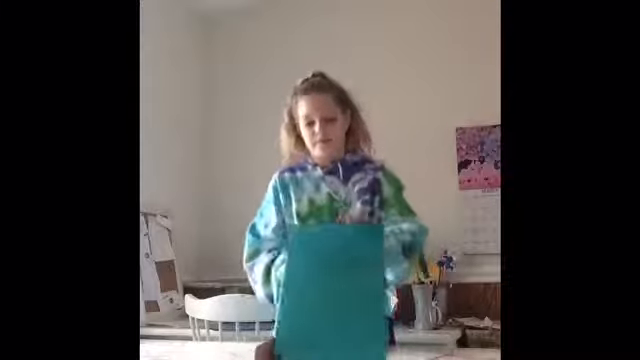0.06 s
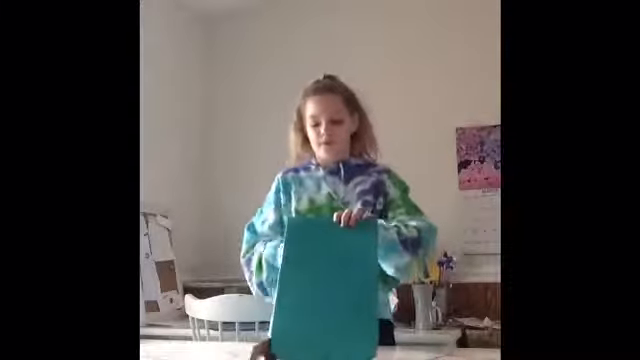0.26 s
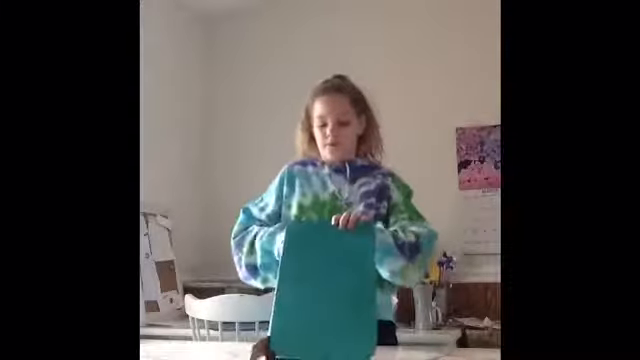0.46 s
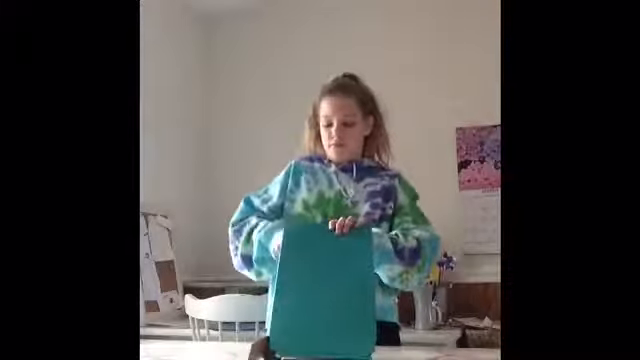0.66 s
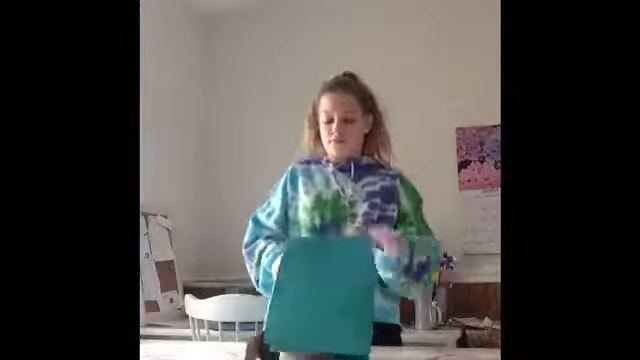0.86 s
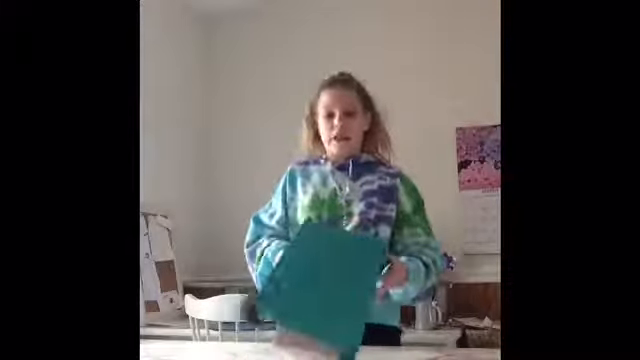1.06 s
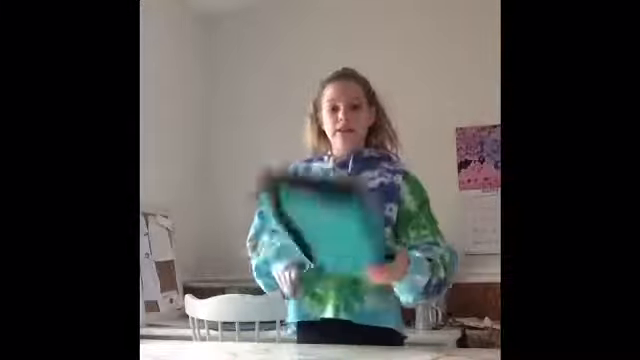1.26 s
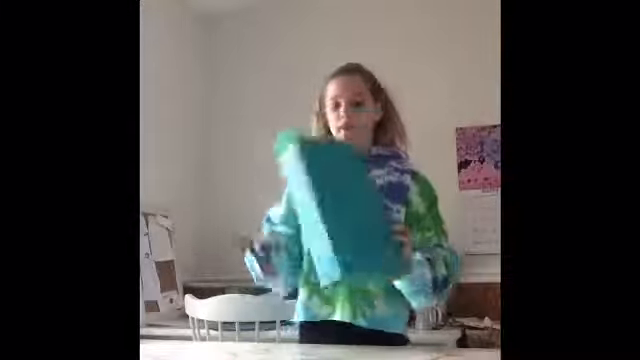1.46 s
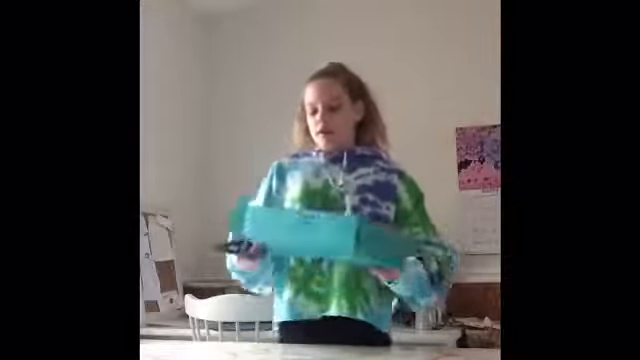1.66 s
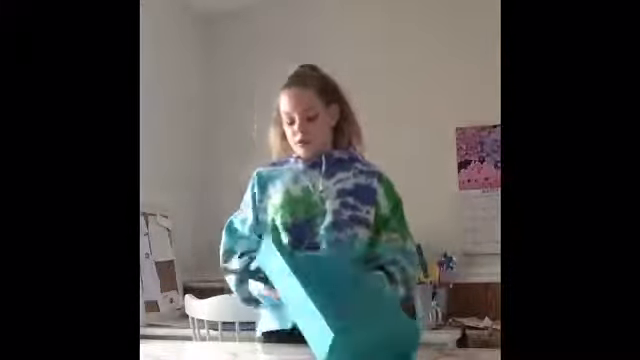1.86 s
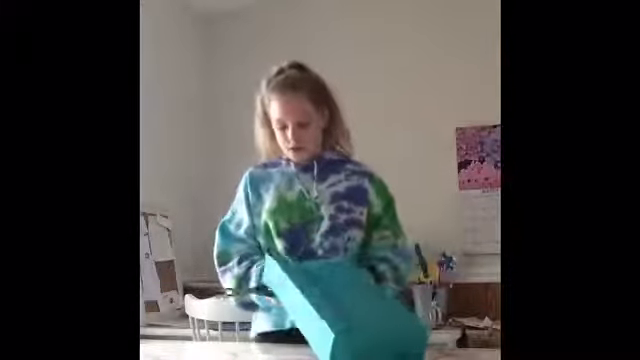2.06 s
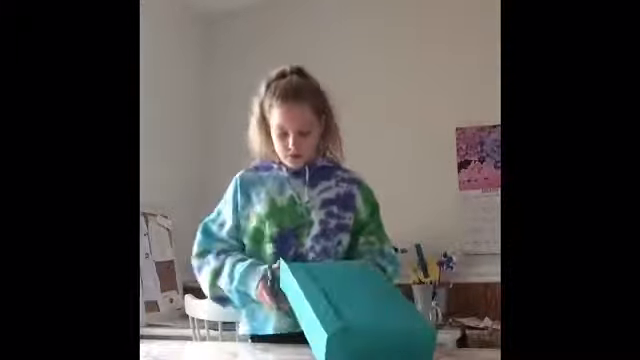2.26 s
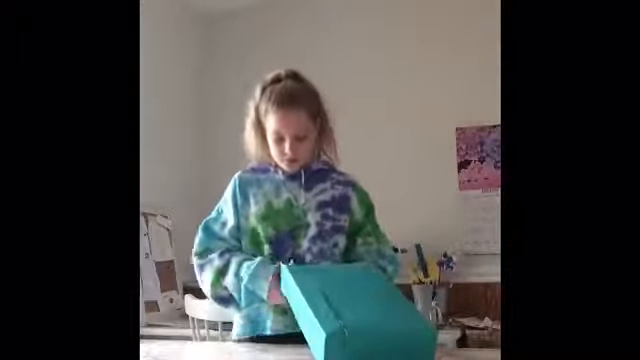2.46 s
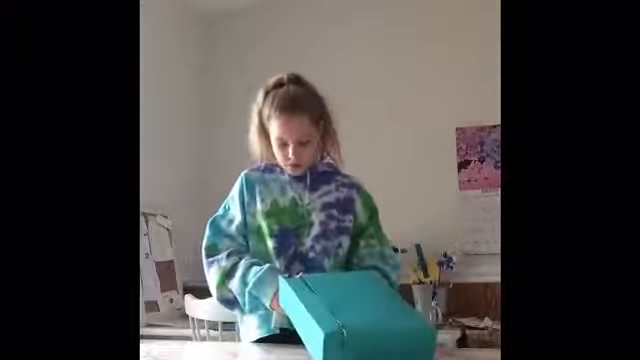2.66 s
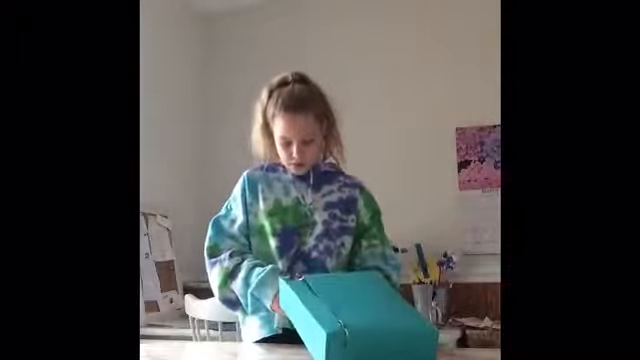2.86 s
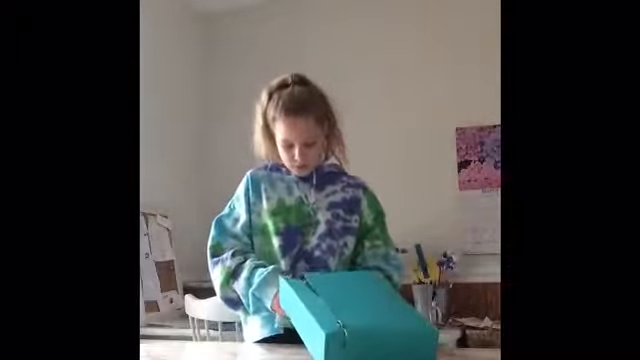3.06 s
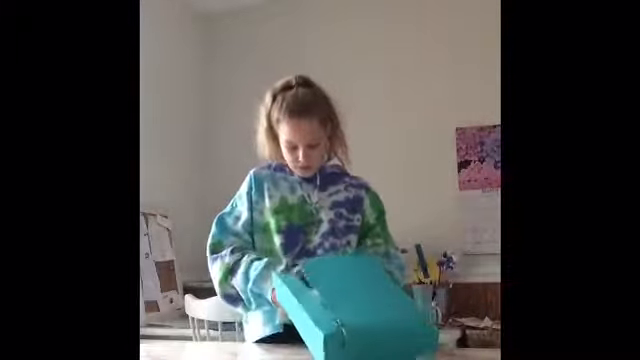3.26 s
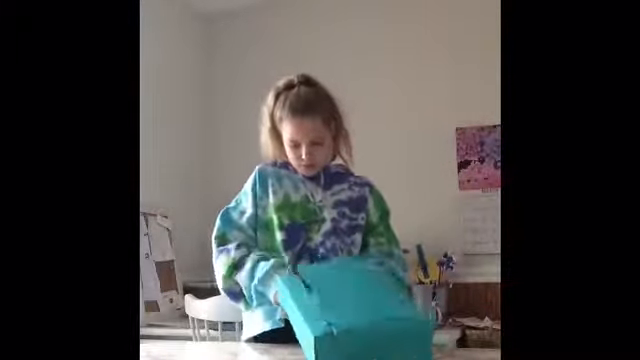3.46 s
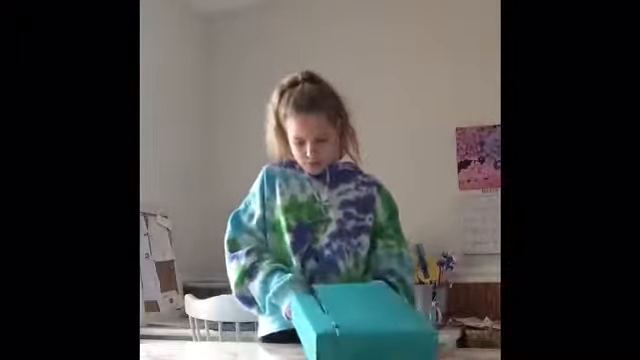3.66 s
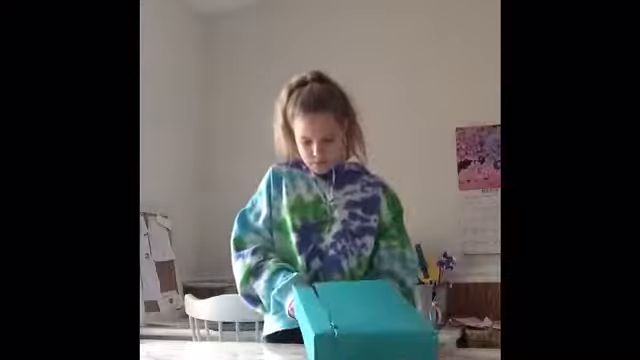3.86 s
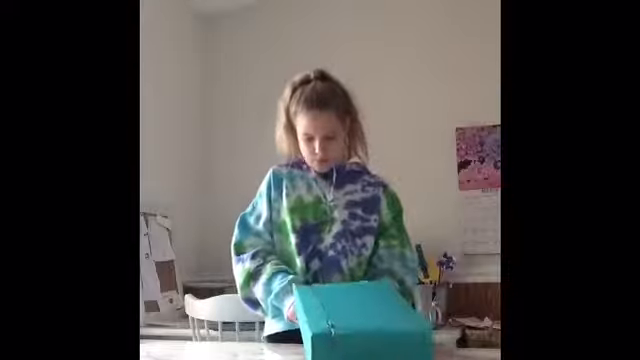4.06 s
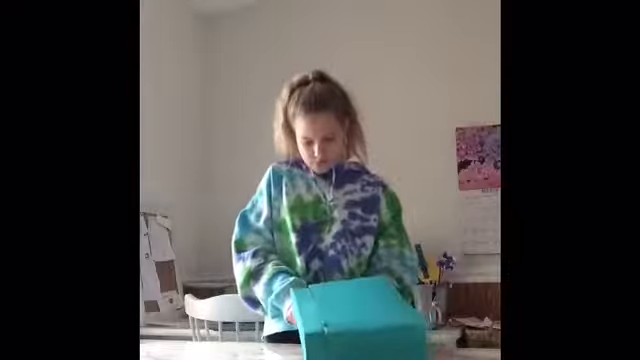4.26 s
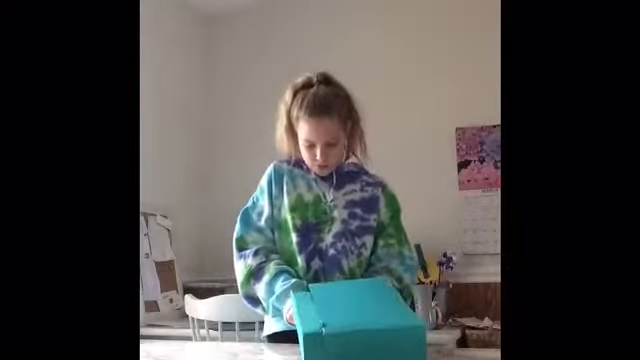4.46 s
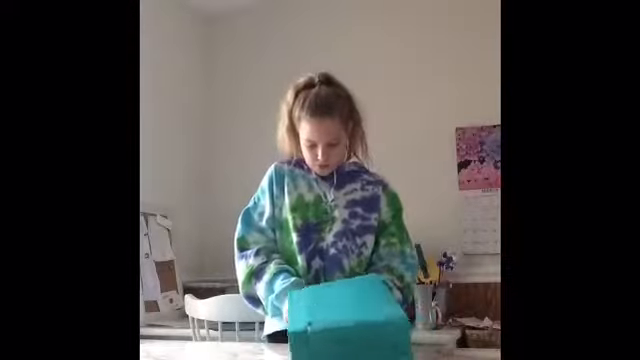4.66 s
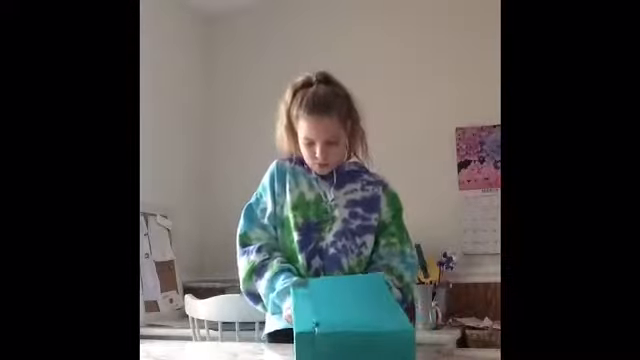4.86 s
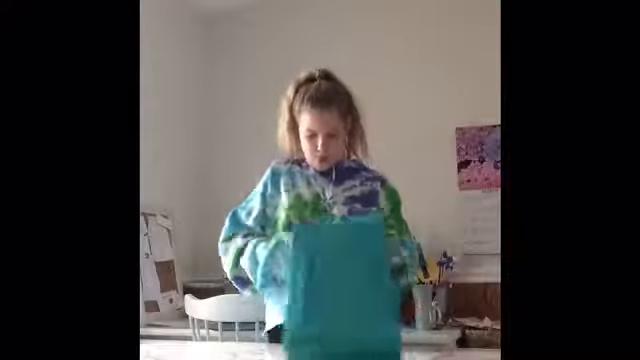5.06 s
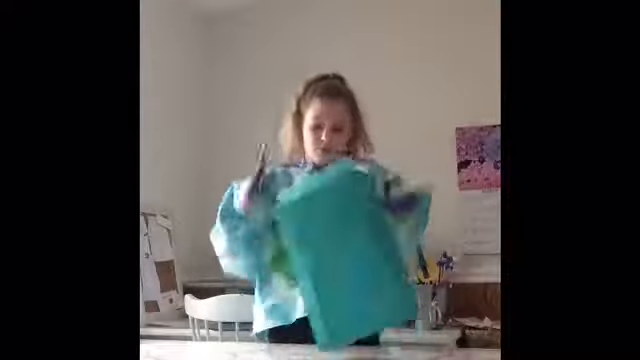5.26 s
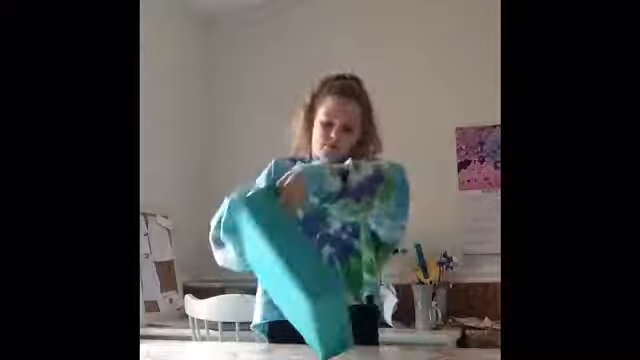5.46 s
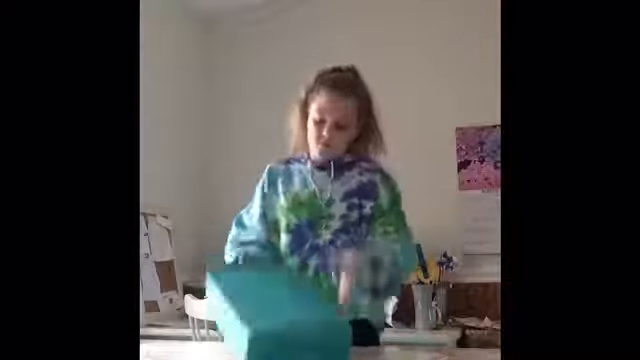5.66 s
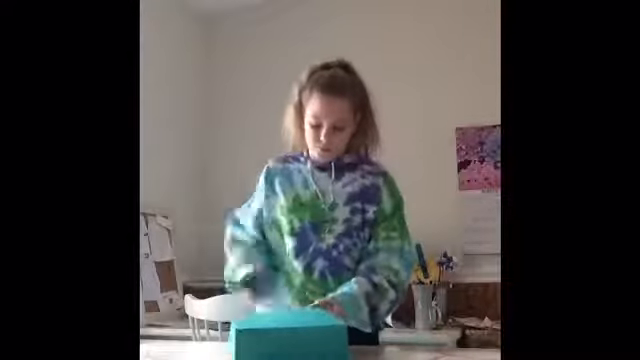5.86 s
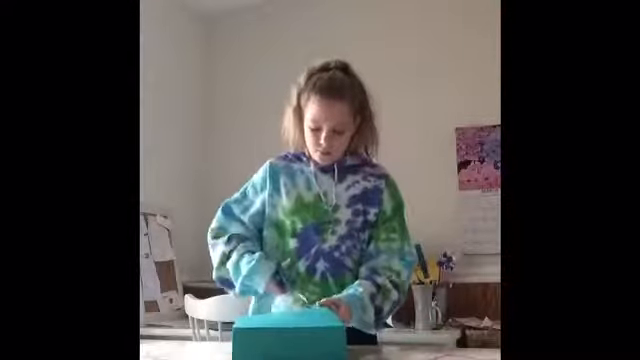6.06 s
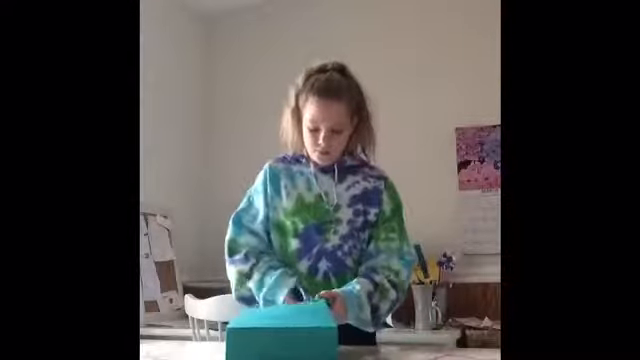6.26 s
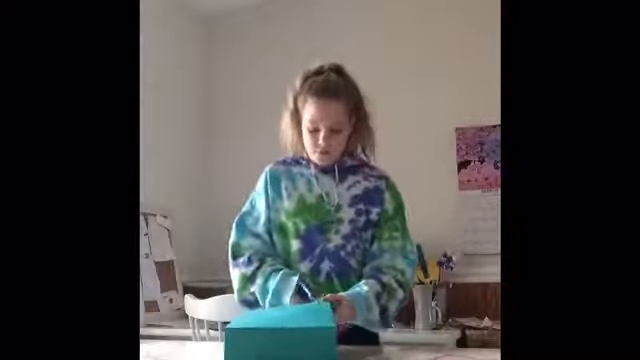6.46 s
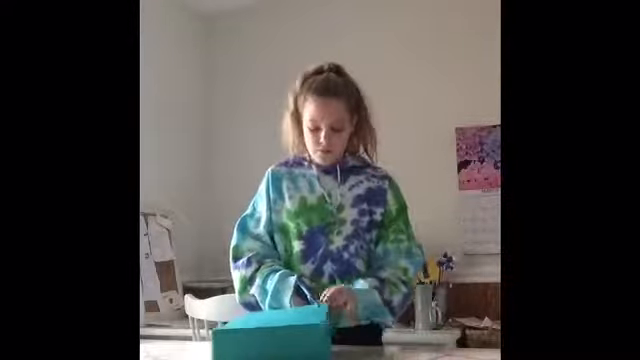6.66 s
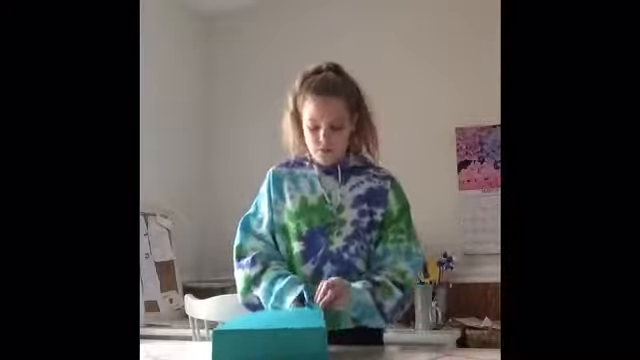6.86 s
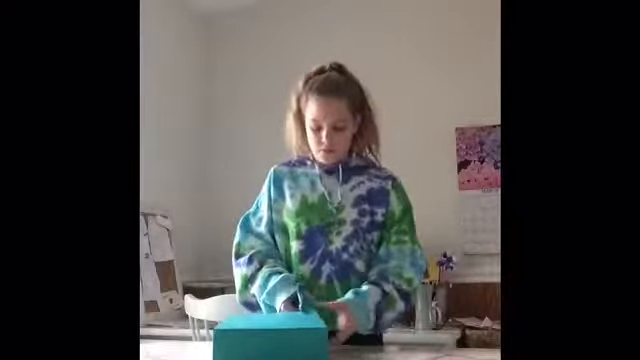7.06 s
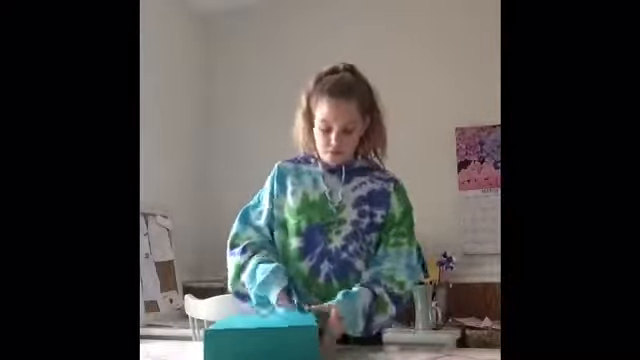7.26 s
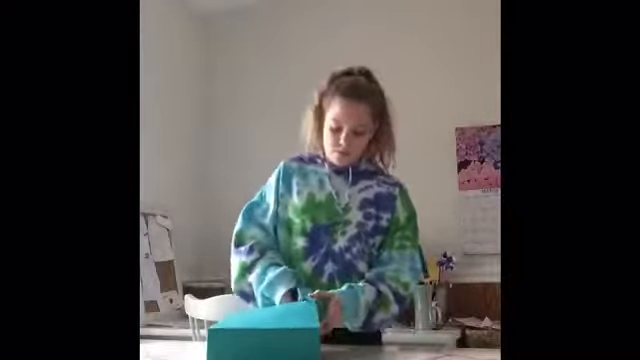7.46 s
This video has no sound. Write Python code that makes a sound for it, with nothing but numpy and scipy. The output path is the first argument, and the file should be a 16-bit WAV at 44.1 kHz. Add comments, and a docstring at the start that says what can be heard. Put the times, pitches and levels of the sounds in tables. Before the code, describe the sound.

In a small, quiet room with a faint hum, a nearby cardboard box scrapes, creaks and taps as someone handles it. A sharp, hollow knock on the table is followed by a short run of scissor snips with a light metallic rasp. Two duller thuds come next as the box is turned and set down, then soft rubbing, sleeve rustle, small scissor clicks and a very faint, thin squeak.

```python
"""A small, quiet room, where someone turns a thin cardboard box on a table and cuts it with scissors.
Impacts excite the modes of the panels and of the hollow body, so the box clacks and thuds. Stick-slip
friction makes the card scrape and creak and the blades rasp; snapping shut, they jolt the box and ring.
Sleeves rustle, and a thin squeak falls near the end. Behind it lie a low hum and, briefly, a faint tone."""
import sys
import numpy as np
from scipy import signal
from scipy.io import wavfile
from scipy.ndimage import uniform_filter1d

SR = 44100
rng = np.random.default_rng(int(sys.argv[2]) if len(sys.argv) > 2 else 0)


def waveform_to_disk(signal):
    """Save audio, clipped to [-1, 1], as 16-bit WAV at the path in sys.argv[1]."""
    frames = np.transpose(np.atleast_2d(signal))
    scaled = np.clip(frames, -1, 1) * 32767
    samples = np.round(scaled).astype(np.int16)
    wavfile.write(sys.argv[1], SR, samples)


N = 331191
TIME = np.arange(N) / SR

# Spectrum of struck card. Each row: frequency in Hz, relative level in dB.
CARD_SPECTRUM = [(330, -29), (520, -6.5), (720, -10.5), (850, 0), (1100, -7.5), (1260, -6.5), (1420, -3.5),
                 (1700, 0.5), (2100, -7.5), (2800, -7), (3400, -19.5), (5000, -38)]
# Scissor cuts. Each row: closing time in seconds, clack level in dB, crack level in dB,
# lead of the bite before closing in seconds, relative bite level in dB.
CUTS = [(3.569, -45, -71, 0.0033, -64.5), (4.085, -32, -47.5, 0.013, -50.5),
        (4.601, -35, -57.5, 0.03, -49.5), (4.785, -34.5, -55, 0.037, -49.5)]


def box_impacts():
    """Impact excitation: firm knocks wake the whole box, dull thuds mostly its low modes."""
    # Each row: start in seconds, panel, body and crack levels in dB, body centre in Hz.
    knocks = [(.124, -48, -46, -62, 310), (0.141, -48.5, -48, -52.5, 280), (.195, -52, -55.5, -62, 218),
              (.391, -48, -47.5, -51, 384), (.494, -53, -60, -76, 390), (.887, -53.5, -56.5, -65, 150),
              (0.983, -56.5, -73, -73, 170), (1.017, -50, -49, -58.5, 350), (1.308, -49, -52.5, -54.5, 330),
              (1.606, -41, -42.5, -49.5, 384), (1.622, -56, -46, -40.5, 303), (1.895, -29.5, -31, -48, 357),
              (1.903, -17.5, -25, -26, 430), (2.278, -46.5, -68.5, -70, 400), (2.33, -52, -53, -71.5, 350),
              (2.411, -63.5, -77, -81, 219), (2.544, -54, -57.5, -58, 327), (2.666, -57, -66, -80, 250),
              (4.236, -62, -56, -70.5, 310), (5.0, -45.5, -44, -58, 363), (5.075, -37.5, -51, -55, 395),
              (5.284, -54.5, -57.5, -65, 330), (5.373, -46, -58, -60.5, 387),
              (5.723, -33.5, -38, -51.5, 340), (6.045, -55.5, -59, -56, 300),
              (6.756, -50.5, -50.5, -70, 330), (6.821, -54, -58, -65, 350), (7.464, -51.5, -48.5, -68, 210)]
    # Each row: start in seconds, body level in dB, body centre in Hz.
    thuds = [(.804, -53.5, 300), (.862, -48.5, 140), (1.144, -53, 203), (1.905, -41, 150),
             (5.44, -53.5, 270), (5.485, -32, 214), (5.723, -47, 150)]
    out = np.zeros(N)
    for s, panel_db, body_db, crack_db, centre_hz in knocks:
        add(out, s, hit(panel_db, body_db, crack_db, centre_hz))
    for s, db, centre_hz in thuds:
        add(out, s, hit(panel_db=db - 17, body_db=db, crack_db=db - 23.5, centre_hz=centre_hz))
    return out


def hit(panel_db, body_db, crack_db, centre_hz):
    """Superposition: one blow sounds the stiff panels, the hollow body and a crack at the contact."""
    # Each row: frequency in Hz, relative level in dB.
    crack_spectrum = [(2200, -34), (3200, -1), (3800, 3), (5000, -4), (7500, -9.5), (10500, -14.5),
                      (14000, -15.5), (16500, -17.5)]
    t = np.arange(SR // 4) / SR
    strength_db, hardness_db = panel_db + 39.5, crack_db - body_db
    t60 = 0.12 * 2 ** (strength_db / 66.5)
    # A hard contact is brighter; a strong blow presses longer and loses treble.
    tilt_db = 0.97 + 0.4644 * hardness_db - 0.06 * strength_db
    snap = blow(t, t60, direct=.5, echo=.3, echo_s=0.0048, bloom_db=0)
    panels = struck(panel_clack(t, t60, tilt_db), panel_db)
    body = struck(hollow_body(t, centre_hz), body_db)
    return panels + body + struck(colour(snap, crack_spectrum), crack_db)


def panel_clack(t, t60, tilt_db):
    """Plate vibration: the strongest modes stand out of a dense burst; a gripping hand damps both."""
    # Each row: frequency in Hz, relative level in dB, free 60 dB decay time in seconds.
    panel_modes = [(684, -7, .2), (725, -3, .21), (936, -5, .19), (1056, -1, .14), (1110, 1, .14),
                   (1165, 0, .12), (1270, 2, .14), (1625, -6, .15), (1725, -7, .14), (1833, -5, .13),
                   (2233, -11, .12)]
    modes = ringing(t, panel_modes, lambda hz: tilt_db * np.log2(hz / 1400), scatter_db=2.5)
    damping = amp(-60 * t * max(0, 1 / t60 - 1 / .14))
    modes *= (1 - np.exp(-t / .0006)) * damping
    burst = blow(t, t60, direct=.5, echo=.3, bloom_db=2.5)
    return struck(colour(burst, CARD_SPECTRUM, tilt_db), 0) + struck(modes, -3.5)


def hollow_body(t, centre_hz, focus_db=13, build_s=0.01):
    """Resonance: the box's low modes build up after a blow, favouring those near centre_hz."""
    # Each row: frequency in Hz, relative level in dB, 60 dB decay time in seconds.
    box_modes = [(130, -3.5, 0.28), (175, -4, .15), (217.5, 1, 0.16), (287.5, 3, 0.18), (370, -17, 0.18),
                 (415, -6.5, 0.18), (518, -6.5, 0.13)]
    modes = ringing(t, box_modes, lambda hz: -focus_db * np.log2(hz / centre_hz) ** 2, scatter_db=1.5)
    push_spectrum = [(50, -34), (centre_hz / 2, -11), (centre_hz, 0), (1.48 * centre_hz, -2), (900, -30)]
    push = colour(blow(t, 0.26), push_spectrum)
    return (struck(modes, 0) + 0.33 * struck(push, 0)) * (1 - np.exp(-t / build_s))


def ringing(t, modes, weight_db, scatter_db):
    """Free vibration: damped modes start from rest; the place of the blow varies their strength."""
    hz, db, t60 = np.transpose(modes)[:, :, None]
    size = amp(db + weight_db(hz) + scatter_db * rng.standard_normal(hz.shape))
    size[::2] *= -1  # neighbours start in opposite directions
    return (size * np.exp(-np.log(1000) * t / t60) * np.sin(2 * np.pi * hz * t)).sum(0)


def blow(t, t60, direct=0.34, echo=0.18, echo_s=.009, bloom_db=3):
    """Impulse response of a contact: a sharp front, dense decaying flutter and one reflection."""
    swell_db = bloom_db * np.exp(-((t - echo_s) / .005) ** 2) + 5 * np.exp(-t / .002)
    flutter = rng.choice([-1, 1], len(t)) * amp(swell_db - 60 * t / max(t60, .02))
    flutter /= np.linalg.norm(flutter)
    flutter[0] += direct
    flutter[round(echo_s * rng.uniform(.9, 1.1) * SR)] += echo
    return flutter


def scissor_impacts(steel_t60=0.16):
    """Mechanical coupling: closing or loosely clicking blades jolt the box and ring their own steel."""
    # Each row: start in seconds, click level in dB, steel ring level in dB.
    clicks = [(.717, -56.5, -55.5), (0.805, -65, -79), (1.101, -65.5, -53.5), (4.37, -54, -47),
              (4.927, -56, -76), (6.206, -59, -73), (6.597, -56, -79), (7.035, -56.5, -71)]
    # Each row: frequency in Hz, relative level in dB.
    steel_spectrum = [(3000, -19), (4500, -17.5), (6500, 1.5), (7300, -6), (8300, 3.5), (11000, -10.5),
                      (14000, 0), (16000, -1)]
    out, t = np.zeros(N), np.arange(SR // 4) / SR
    for s, db, crack_db, _, _ in CUTS:
        add(out, s, hit(panel_db=db, body_db=db - 6, crack_db=crack_db, centre_hz=400))
        add(out, s, struck(colour(blow(t, steel_t60), steel_spectrum), crack_db - 5))
    for s, db, steel_db in clicks:
        add(out, s, hit(panel_db=db + 1.6, body_db=db - 6, crack_db=db, centre_hz=346))
        add(out, s, struck(colour(blow(t, steel_t60), steel_spectrum), steel_db))
    return out


def blade_friction(bite_rise_s=0.0074, bite_fade_s=0.08):
    """Friction excites resonance: the blades rasp as they slide and bite, and sing where they cross."""
    # Each row: start in seconds, length in seconds, relative level in dB.
    slides = [(3.706, 0.13, -54.5), (3.818, 0.045, -56), (3.931, 0.076, -58.5), (4.163, 0.083, -58.5),
              (4.317, 0.12, -56.5), (4.421, 0.05, -50.5), (4.454, 0.053, -50)]
    # Each row of both spectra: frequency in Hz, relative level in dB.
    scrape_spectrum = [(150, 9.5), (500, 8.5), (1150, 2), (1700, 3.5), (2100, -4.5), (2650, -4),
                       (3100, -23), (4500, -21.5)]
    hiss_spectrum = [(2200, -21), (3500, 9), (5000, 1), (7400, -3), (8500, -0.5), (10000, -4), (11400, -4),
                     (13000, -7), (16000, -13)]
    # Each row: time in seconds, resonant frequency in Hz.
    blade_pitch = [(3.85, 8260), (4.3, 8300), (4.42, 10700), (4.8, 11000)]
    moves = [(stroke_timing(s, length), db) for s, length, db in slides]
    moves += [((s - lead, bite_rise_s, bite_fade_s), db) for s, _, _, lead, db in CUTS]
    strokes = [(timing, db + 1.5, db - 6, 7) for timing, db in moves[:len(slides)]]
    strokes += [(timing, db + 1.5, db - 4.5, 7) for timing, db in moves[len(slides):]]  # bites hiss more
    rasp = stick_slip(strokes, scrape_spectrum, hiss_spectrum,
                      per_s=1800, spread_db=4.5, fade_db=7.5, jerk_db=5, t60=0.12)
    singing = resonate(rasp, np.interp(TIME, *np.transpose(blade_pitch)), width_hz=600)
    return rasp + amp(-0.5) * singing


def card_friction():
    """Sliding friction of hands and table on card: the more a rub hisses, the brighter it scrapes."""
    # Each row: start in seconds, length in seconds, relative scrape and hiss levels in dB.
    rubs = [(0, 0.22, -69, -56), (0.133, 0.11, -43, -59), (0.391, 0.059, -40.5, -49.5),
            (0.427, 0.069, -47, -63), (0.508, 0.13, -53, -61.5), (0.711, 0.082, -51.5, -57),
            (0.801, 0.095, -51.5, -61.5), (1.235, 0.13, -42.5, -48.5), (1.344, 0.062, -45, -48),
            (1.612, 0.023, -37, -39.5), (2.165, 0.092, -44, -50.5), (2.56, 0.091, -53.5, -55.5),
            (4.93, 0.041, -53, -58), (4.983, .125, -39, -49), (5.089, 0.077, -45, -51),
            (5.29, 0.059, -50.5, -66.5), (5.535, .07, -44.5, -52), (5.589, 0.095, -52.5, -66.5),
            (5.8, 0.092, -48, -54.5), (6.04, .045, -40.5, -51), (6.095, .14, -49, -56.5),
            (6.19, 0.082, -45, -50), (6.289, .13, -51.5, -63), (6.46, 0.094, -56.5, -60),
            (6.7, 0.084, -44, -49.5), (6.822, 0.078, -42.5, -51.5), (7.285, 0.07, -40.5, -49.5),
            (7.384, 0.066, -44.5, -51.5), (7.473, 0.073, -48, -57)]
    # Each row of both spectra: frequency in Hz, relative level in dB.
    scrape_spectrum = [(70, -34), (130, -1), (280, 0), (450, -3.5), (1000, 3.5), (1700, 2.5), (2800, -2),
                       (3500, -11.5), (5000, -36)]
    hiss_spectrum = [(2000, -19), (3400, -1), (4500, -3.5), (6000, -6.5), (8200, -8), (10500, -12.5),
                     (14500, -13.5), (16500, -16.5)]
    strokes = []
    for s, length, scrape_db, hiss_db in rubs:
        tilt_db = 3.5 + 0.72 * (hiss_db - scrape_db)
        strokes.append((stroke_timing(s, length), scrape_db - 2, hiss_db - 0.5, tilt_db))
    return stick_slip(strokes, scrape_spectrum, hiss_spectrum,
                      per_s=2600, spread_db=4, fade_db=13, jerk_db=1.5, t60=0.087)


def stroke_timing(s, length, swell_share=0.43):
    """Force envelope of a stroke: its start, rise time and fall time in seconds."""
    return s, swell_share * length, (1 - swell_share) * length


def stick_slip(strokes, scrape_spectrum, hiss_spectrum, per_s, spread_db, fade_db, jerk_db, t60):
    """Stick-slip friction: a hail of tiny slips follows each stroke's force and sets the card fluttering."""
    out, ring_t = np.zeros(N), np.arange(SR // 12) / SR
    for (s, swell, fade), scrape_db, hiss_db, tilt_db in strokes:
        t = np.arange(-swell, fade + 0.07, 1 / SR)  # zero at peak force
        force_db = np.interp(t, [-swell, 0, fade, fade + 0.062], [-fade_db, 0, -fade_db, -40])
        force = amp(force_db) * np.minimum(1, (t + swell) / 0.0046)
        slips = grains(len(t), per_s, spread_db) * amp(jerk_db * drift(len(t), 123.7))
        flutter = signal.fftconvolve(slips, blow(ring_t, t60, direct=0.78))[:len(t)]
        scrape = amp(scrape_db) * unit_rms(colour(flutter, scrape_spectrum, tilt_db))
        hiss = amp(hiss_db) * unit_rms(colour(flutter, hiss_spectrum))
        add(out, s, force * (scrape + hiss))
    return out


def moving_contact(x, depth_db, size=512):
    """Position-dependent excitation: as the contact moves over the card, resonances come and go."""
    spectra = signal.stft(x, nperseg=size, noverlap=size * 3 // 4)[2]
    patches = uniform_filter1d(rng.standard_normal(spectra.shape), size=4, axis=0)
    patches = uniform_filter1d(patches, size=9, axis=1)
    gain = unit_rms(amp(depth_db * unit_rms(patches)))
    return signal.istft(spectra * gain, nperseg=size, noverlap=size * 3 // 4)[1][:N]


def creaks(width_hz=660, rise_s=0.0014, t60=0.089):
    """Forced resonance: a quick run of slips pumps one resonance of the card, which dies away."""
    # Each row: start in seconds, frequency in Hz, level in dB.
    slip_runs = [(0.124, 1870, -47.5), (0.138, 2540, -45), (0.391, 1550, -38.5), (1.305, 1810, -45),
                 (1.621, 2570, -39.5), (1.624, 8040, -49), (4.369, 3500, -48.5), (5.022, 1120, -42),
                 (5.556, 3360, -53), (6.821, 1760, -52)]
    out, t = np.zeros(N), np.arange(SR // 5) / SR
    envelope = amp(-60 * t / t60) * (1 - np.exp(-t / rise_s))
    for s, hz, db in slip_runs:
        pitch = np.full(len(t), hz)
        ring = resonate(rng.standard_normal(len(t)), pitch, width_hz)
        ring = resonate(ring, pitch, width_hz)  # a second pass narrows the peak
        add(out, s, struck(ring * envelope, db))
    return out


def sleeve_rustle():
    """Shot noise: cloth fibres rustle as the arms move, and card ticks as it flexes under the fingers."""
    # Each row: time in seconds, relative rustle level in dB.
    arm_motion = [(0.0, -56.5), (0.38, -62), (1.11, -63.5), (1.36, -61.5), (2.17, -61.5), (2.34, -67),
                  (2.9, -72.5), (3.59, -71), (3.89, -66.5), (4.8, -69), (4.95, -62), (5.24, -64.5),
                  (5.7, -60.5), (5.87, -68.5), (6.1, -67.5), (6.2, -62.5), (7.29, -64), (7.5, -54.5)]
    # Each row: frequency in Hz, relative level in dB.
    cloth_spectrum = [(120, -7), (300, 0), (1000, 0), (1800, -3), (2800, -6), (4200, -7), (5500, -12),
                      (8500, -13), (15000, -19.5)]
    level_db = np.interp(TIME, *np.transpose(arm_motion)) + 0.23 + 2 * drift(N, 30)
    flexes = grains(N, per_s=55, spread_db=5)
    ticks = signal.fftconvolve(flexes, blow(np.arange(SR // 10) / SR, 0.064, direct=0.65))[:N]
    ticks = unit_rms(colour(ticks, CARD_SPECTRUM, tilt_db=1.5))
    cloth = unit_rms(colour(grains(N, per_s=5000, spread_db=0.9), cloth_spectrum))
    return amp(level_db) * (cloth + amp(-8) * ticks)


def sleeve_swishes(hz=4220, fade_db=6.5):
    """Friction noise: a sleeve brushes the card with a narrow hiss that peaks in mid-sweep."""
    # Each row: start in seconds, length in seconds, peak level in dB.
    sweeps = [(1.097, 1.4, -69.5), (6.7, 0.44, -66.5)]
    out = np.zeros(N)
    for s, length, db in sweeps:
        path = [(s, hz, db - fade_db), (s + length / 2, hz, db), (s + length, hz, db - fade_db)]
        out += narrow_noise(path, width_hz=1300)
    return out


def squeak():
    """Narrow-band noise gliding down through the top of the treble is heard as a thin squeak."""
    # Each row: time in seconds, pitch in Hz, level in dB.
    glide = [(6.98, 16300, -80), (7.04, 15000, -69), (7.11, 14250, -74), (7.19, 13200, -72),
             (7.205, 11900, -70)]
    return narrow_noise(glide, width_hz=700)


def room(x, wet_db):
    """Reverberation: a weak diffuse tail follows the direct sound, and its bass lasts longest."""
    # Each row: frequency in Hz, 60 dB decay time in seconds.
    decay_times = [(150, 0.77), (700, 0.43), (2000, 0.17), (5000, 0.16), (14000, 0.27)]
    hz, t, spectra = signal.stft(rng.standard_normal(SR * 2 // 3), SR, nperseg=256)
    swell = np.minimum(1, t / 0.0028)
    decay = amp(-60 * t / curve_at(decay_times, hz)[:, None])
    tail = signal.istft(spectra * swell * decay, SR, nperseg=256)[1]
    return x + amp(wet_db) * signal.fftconvolve(x, tail / np.linalg.norm(tail))[:N]


def far_tone():
    """A very narrow noise band has a pitch: a faint far tone rises a little and fades."""
    # Each row: time in seconds, pitch in Hz, level in dB.
    glide = [(3.18, 500, -75), (3.26, 518, -66.5), (3.37, 545, -63), (3.48, 560, -68), (3.8, 565, -74),
             (4.2, 565, -82)]
    return narrow_noise(glide, width_hz=50)


def room_hum(floor_db=-63.04):
    """Phase and amplitude modulation make a low hum waver over dull room noise."""
    # Each row: frequency in Hz, level in dB.
    partials = [(128, -72), (178, -75.5), (242, -74.5)]
    # Each row: frequency in Hz, relative level in dB.
    floor_spectrum = [(25, -33.5), (40, -23), (62, -9.5), (95, -10.5), (122, 4.5), (160, -2), (250, -1),
                      (320, -13), (500, -11), (1000, -19.5), (2000, -30), (4000, -30), (16000, -32.5)]
    hum = np.zeros(N)
    for hz, db in partials:
        tone = np.sin(2 * np.pi * hz * TIME + 1.96 * drift(N, 28))
        hum += amp(db) * unit_rms(tone * (1 + 0.21 * drift(N, 4.9)))
    return hum + amp(floor_db) * unit_rms(colour(rng.standard_normal(N), floor_spectrum))


def narrow_noise(path, width_hz):
    """Random modulation spreads a tone into a band that follows a path of time, pitch and level."""
    s, hz, db = np.transpose(path)
    turns = np.cumsum(np.interp(TIME, s, hz)) / SR
    waver = drift(N, width_hz) + 1j * drift(N, width_hz)
    level = amp(np.interp(TIME, s, db, left=-140, right=-140))
    return level * unit_rms((waver * np.exp(2j * np.pi * turns)).real)


def grains(count, per_s, spread_db):
    """A Poisson process of fibres catching and letting go: many small clicks, a few large."""
    size = amp(spread_db * np.minimum(rng.exponential(1, count), 4))
    return unit_rms(size * rng.choice([-1, 1], count) * (rng.random(count) < per_s / SR))


def drift(count, per_s):
    """Slow random variation of about unit size, interpolated between per_s values a second."""
    knots = rng.standard_normal(2048)
    return np.interp(np.arange(count) * per_s / SR, np.arange(2048), knots, period=2048)


def resonate(x, hz, width_hz):
    """A damped resonator of unit gain follows a pitch curve."""
    turn = np.exp(2j * np.pi * np.cumsum(hz) / SR)
    pole = np.exp(-np.pi * width_hz / SR)
    return 2 * (turn * signal.lfilter([1 - pole], [1, -pole], x / turn)).real


def colour(x, points, tilt_db=0, size=2048):
    """Minimum-phase filtering to a spectrum, tilted by tilt_db per octave over the panels' range."""
    hz = abs(np.fft.fftfreq(size, 1 / SR))
    octaves = np.log2(np.clip(hz, 600, 3300) / 1400)
    skirts = np.minimum(1, (hz + 1) / points[0][0]) * np.minimum(1, points[-1][0] / (hz + 1)) ** 2
    log_gain = np.log(amp(curve_at(points, hz) + tilt_db * octaves) * skirts)
    taps = np.fft.ifft(np.exp(np.conj(signal.hilbert(log_gain)))).real
    return signal.fftconvolve(x, taps[:size // 2])[:len(x)]


def curve_at(points, hz):
    """Linear interpolation over log frequency."""
    knots_hz, values = np.transpose(points)
    return np.interp(np.log(hz + 1), np.log(knots_hz + 1), values)


def struck(x, db):
    """Sets the RMS level of the first 25 ms of a hit."""
    return amp(db) * x / np.sqrt(np.mean(x[:SR // 40] ** 2) + 1e-20)


def amp(db):
    return 10 ** (np.asarray(db) / 20)


def unit_rms(x):
    return x / np.sqrt(np.mean(x ** 2) + 1e-20)


def add(mix, s, sound):
    part = mix[max(0, round(s * SR)):][:len(sound)]
    part += sound[:len(part)]


def scene():
    """Superposition: near impacts and friction reverberate over the quiet background."""
    friction = card_friction() + blade_friction() + sleeve_swishes() + sleeve_rustle()
    friction = moving_contact(friction, depth_db=2.6)
    near = box_impacts() + scissor_impacts() + creaks() + friction + squeak()
    far = far_tone() + room_hum()
    return (room(near, wet_db=-20) + far)[None]


def record(dry):
    """Band limiting: a low-pass filter removes the treble above 16.1 kHz."""
    taps = signal.firwin(511, 16100, window=("kaiser", 8), fs=SR)
    return signal.oaconvolve(dry, taps[None], "same")


dry = scene()
out = record(dry)
waveform_to_disk(out)
```